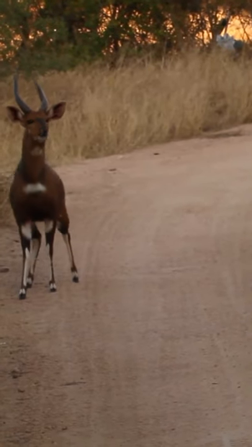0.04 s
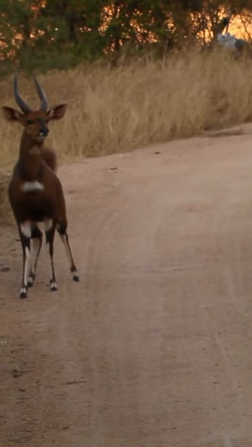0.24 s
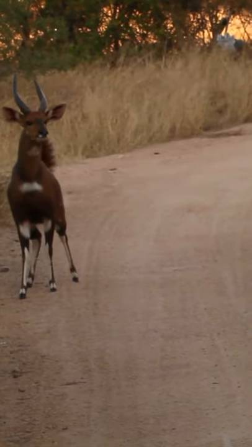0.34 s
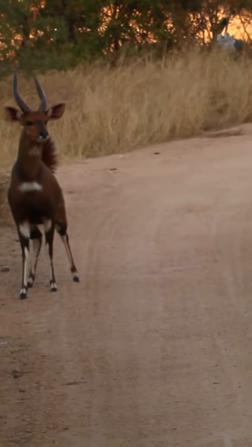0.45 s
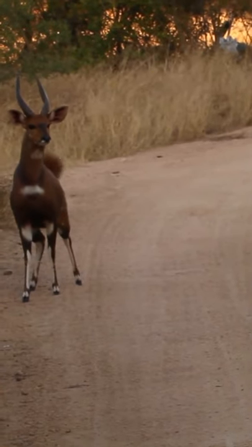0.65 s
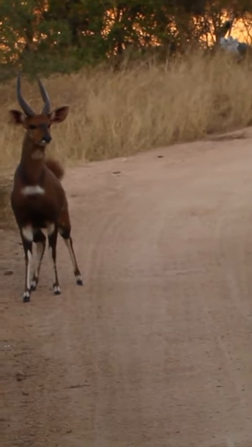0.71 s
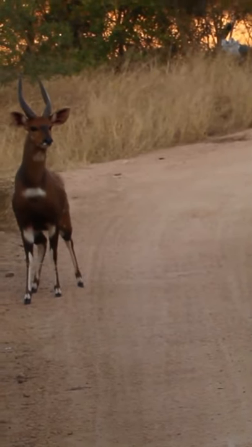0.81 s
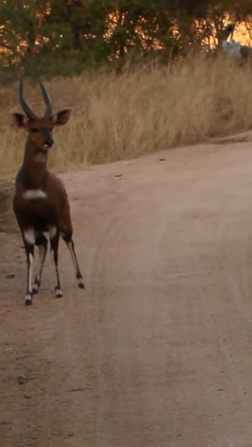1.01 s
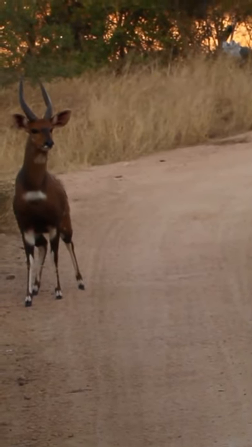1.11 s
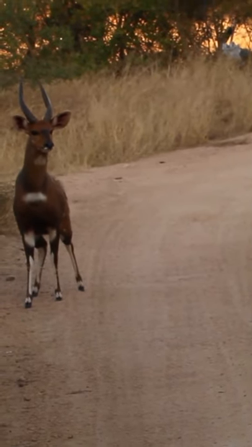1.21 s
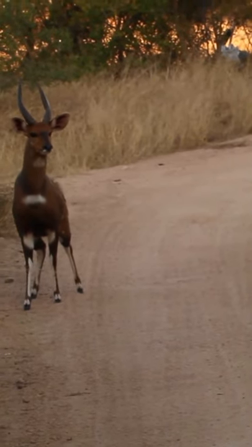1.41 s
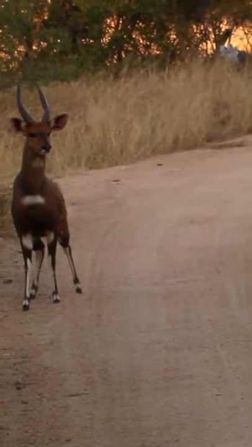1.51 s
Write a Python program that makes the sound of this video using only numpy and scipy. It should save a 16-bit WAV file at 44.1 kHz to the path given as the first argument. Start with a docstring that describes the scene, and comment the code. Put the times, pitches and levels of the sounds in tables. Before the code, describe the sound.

An antelope gives one harsh bark outdoors, echoing briefly over faint distant peeps.

```python
"""An antelope gives one harsh alarm bark on a dirt road at dusk.
Source and filter: irregular slaps of the vocal folds and a blast of air excite its throat resonances.
Road and grass scatter the sound, the bush adds a dull tail and far trees return a late echo.
Far off a small creature peeps over a soft wavering hum and the evening hiss; one faint tick is near."""
import sys
import numpy as np
from scipy import signal
from scipy.fft import rfft, irfft
from scipy.io import wavfile
from scipy.ndimage import uniform_filter1d

SR = 44100
rng = np.random.default_rng(int(sys.argv[2]) if len(sys.argv) > 2 else 0)


def store_pcm(level_fs):
    """Save levels as 16-bit WAV."""
    pcm = np.round(np.clip(level_fs, -1, 1) * 32767).astype(np.int16)
    wavfile.write(sys.argv[1], SR, np.atleast_2d(pcm).T)


N = 68355
T = np.arange(N) / SR


def amp(db):
    """Amplitude ratio of a level in decibels."""
    return 10 ** (np.asarray(db) / 20)


def unit_rms(x):
    """Normalisation to an rms of 1."""
    return x / np.sqrt(np.mean(x ** 2) + 1e-20)


def steadied(x, size=1700):
    """Division by the running rms holds the level near 1 and leaves the fast grain."""
    power = uniform_filter1d(uniform_filter1d(x ** 2, size), size // 2)
    return x / np.sqrt(abs(power) + 1e-20)


def curve_at(points, hz):
    """Interpolation on a logarithmic frequency axis."""
    point_hz, value = np.transpose(points)
    return np.interp(np.log(hz + 1), np.log(point_hz + 1), value)


def drift(rate_hz):
    """Random fluctuation: low-passed noise of rms 1."""
    hz = np.fft.rfftfreq(N, 1 / SR)
    return unit_rms(irfft(rfft(rng.standard_normal(N)) * np.exp(-(hz / rate_hz) ** 2), N))


def colour(x, spectrum, size=4096):
    """Minimum-phase filtering: the phase is the Hilbert transform of the log gain."""
    log_gain = np.log(amp(curve_at(spectrum, abs(np.fft.fftfreq(size, 1 / SR)))))
    taps = np.fft.ifft(np.exp(np.conj(signal.hilbert(log_gain)))).real
    return signal.oaconvolve(x, taps[:size // 2])[:N]


def resonate(x, hz, width_hz):
    """Resonance by heterodyning: shift hz to zero, low-pass with a double pole, shift back."""
    carrier = np.exp(2j * np.pi * np.cumsum(hz * np.ones(N)) / SR)
    pole = np.exp(-np.pi * width_hz * np.sqrt(2) / SR)
    baseband = signal.lfilter([(1 - pole) ** 2], [1, -2 * pole, pole * pole], x / carrier + 1e-18)
    return 2 * (carrier * baseband).real


def evening_air(level_db=-53, patch_db=2.0, size=1024):
    """Coloured noise whose level fluctuates in patches of time and frequency."""
    # ambient spectrum: frequency_hz, density_db
    spectrum = [(20, -24), (55, -1.5), (90, -11), (170, -9.5), (250, -6.5), (330, -5.5), (450, 5.5),
                (560, -5), (720, 0), (950, -11), (1230, -15.5), (1430, -10.5), (1750, -16.5), (2500, -17.5),
                (3700, -18), (5500, -23), (9000, -26.5), (12000, -26.5), (12500, -30.5), (13100, -21.5)]
    hz, _, bands = signal.stft(rng.standard_normal(N), SR, nperseg=size)
    patches = uniform_filter1d(rng.standard_normal(bands.shape), size=8, axis=0)
    patches = unit_rms(uniform_filter1d(patches, size=4, axis=1))
    bands = bands * amp(curve_at(spectrum, hz)[:, None] + patch_db * patches)
    return amp(level_db) * unit_rms(signal.istft(bands, SR, nperseg=size)[1][:N])


def hum():
    """Narrow bands of noise are heard as a far hum of wavering pitch."""
    # bands of the hum: centre_hz, width_hz, gain_db
    bands = [(364.1, 21, 0), (428, 61, -6), (1402, 91, -17)]
    # its swells: time_s, level_db
    swells = [(0, -56.5), (0.09, -52.5), (0.17, -69), (0.7, -59), (0.93, -53.5), (1.02, -59.5),
              (1.065, -46), (1.14, -58.5), (1.2, -47.5), (1.27, -59), (1.37, -53.5), (1.55, -58.5)]
    tones = sum(amp(db) * steadied(resonate(rng.standard_normal(N), hz, width_hz))
                for hz, width_hz, db in bands)
    return amp(np.interp(T, *np.transpose(swells))) * tones


def peeps(length_s=0.037, fall_hz_per_s=6600, waver_hz=36.2):
    """Frequency modulation: each distant peep is a short sine tone that falls and wavers."""
    # calls of the small creature: start_s, pitch_hz, level_db
    calls = [(0.056, 2840, -71), (0.104, 2790, -63.5), (0.674, 2770, -66), (0.809, 2790, -63),
             (0.95, 2775, -62), (1.079, 2720, -60.5), (1.201, 2720, -60), (1.345, 2720, -60.5),
             (1.461, 2772, -58.5)]
    out = np.zeros(N)
    for start_s, hz, db in calls:
        pitch_hz = hz - fall_hz_per_s * (T - start_s - length_s / 2) + waver_hz * drift(167)
        swell = np.sin(np.pi * np.clip((T - start_s) / length_s, 0, 1)) ** 2
        out += amp(db) * swell * np.sqrt(2) * np.sin(2 * np.pi * np.cumsum(pitch_hz) / SR)
    return out


def tick(start_s=1.4435, level_db=-43, decay_s=.002):
    """A transient: noise with a fast exponential decay is heard as a dry tick."""
    # spectrum of the tick: frequency_hz, gain_db
    spectrum = [(100, -25.5), (500, -2), (1200, 10.5), (2400, -4), (3000, -11), (3700, -3), (4600, -23),
                (12000, -40)]
    burst = (T > start_s) * np.exp(-abs(T - start_s) / decay_s)
    return amp(level_db) * burst * unit_rms(colour(rng.standard_normal(N), spectrum))


def scatter(decay_times, size=256, mean_gap=16):
    """Diffuse reflection: sparse impulses, with equal energy per band and a decay time for each."""
    reflections = rng.choice([-1., 1.], N) * (rng.random(N) < 1 / mean_gap)
    hz, time_s, bands = signal.stft(reflections, SR, nperseg=size)
    t60_s = curve_at(decay_times, hz)[:, None]
    bands = bands * amp(-60 * time_s / t60_s) / np.sqrt(t60_s)
    tail = signal.istft(bands, SR, nperseg=size)[1][:N]
    return tail * np.sqrt(mean_gap * 2 * np.log(1000) / SR)


def outdoors(direct, ground_db=-10.5, ground_t60_s=0.27, echo_s=.243, echo_db=-19):
    """Superposition of direct sound, ground scatter, bush reverberation and an echo from far trees."""
    # response of the bush: frequency_hz, gain_db
    bush_spectrum = [(100, -28), (350, -18.5), (470, 0.5), (600, -15), (800, -0.5), (1050, -17.5),
                     (1400, -20), (1620, -21), (2000, -22.5), (2500, -15), (3500, -27.5), (10000, -27)]
    # its reverberation time: frequency_hz, t60_s
    bush_decay = [(100, 1.2), (350, 0.49), (700, 1.17), (1600, 0.95), (3500, 0.8), (10000, .3)]
    ground = amp(ground_db) * scatter([(100, ground_t60_s), (10000, ground_t60_s)])
    bush = colour(scatter(bush_decay), bush_spectrum)
    dulled = resonate(direct, hz=550, width_hz=240)
    echo = amp(echo_db) * np.interp(T - echo_s, T, dulled, left=0)
    return direct + signal.fftconvolve(direct, ground + bush)[:N] + echo


def mouth_hiss(puffs):
    """Turbulence: air rushing through the mouth hisses, mostly in the treble."""
    # spectrum of the hiss: frequency_hz, density_db
    spectrum = [(100, -48), (2000, -22), (2650, -17), (3050, -3), (3400, 1.5), (3750, -4), (4100, -20.5),
                (4450, -7), (5100, -8), (6200, -14.5), (6900, -16), (7400, -22), (8000, -17.5),
                (8800, -19.5), (9350, -29.5), (10000, -17.5), (11100, -31), (11800, -21), (14000, -40)]
    # hiss relative to the force of the bark: time_s, gain_db
    share = [(0.183, -6), (0.203, -17), (0.222, -12), (0.255, -14), (0.30, -15), (0.345, -22), (0.39, -21)]
    return amp(np.interp(T, *np.transpose(share))) * steadied(colour(puffs, spectrum))


def vocal_folds(since_peak_s, pitch_hz=149.67, sag_per_s=4.0, jitter=.4, shimmer_db=1.5):
    """Glottal source with jitter and shimmer: returns the slaps and three noises pulsed in step."""
    puff_cycles, leak = 0.36, 0.69  # decay of a puff, airflow between puffs
    phase_cycles = np.cumsum(pitch_hz * np.exp(-sag_per_s * since_peak_s + jitter * drift(100))) / SR
    cycle = phase_cycles.astype(int)
    force = amp(shimmer_db * np.clip(rng.standard_normal(N), -2, 2))[cycle]
    slaps = steadied(np.diff(cycle, prepend=0) * force + 1e-4 * rng.standard_normal(N))
    airflow = leak + force * np.exp(-(phase_cycles % 1) / puff_cycles)
    return slaps, [steadied(airflow * rng.standard_normal(N)) for _ in range(3)]


def throat(drive, since_peak_s, body_db=-4.5):
    """Vocal tract filter: gliding formants swell and fade in parallel with a broad response."""
    # broad body of the bark: frequency_hz, density_db
    body = [(30, -68), (90, -49), (135, -27), (180, -16), (280, -8), (370, -4), (470, -5), (540, 0),
            (700, 2), (820, -3.5), (930, 1), (1150, -5), (1350, -1), (1800, -7.5), (2200, -6.5),
            (2480, -34), (3000, -47), (8000, -81.5)]
    # throat resonances: centre_hz, width_hz, gain_db, strongest_s, fade_db_per_s, glide_hz_per_s
    formants = [(185, 26, -16, 0.36, 109, 44.5), (370, 43, -7.5, .32, 12, -4),
                (585, 55, -6, 0.243, 78, -150), (1000.6, 148, -1.5, 0.21, 123, -200),
                (1638, 132, -2, .33, 38, -150), (2106, 157, -16.5, .29, 30, -600)]
    voice = amp(body_db) * steadied(colour(drive, body), size=700)
    for hz, width_hz, db, strongest_s, fade, glide in formants:
        ringing = steadied(resonate(drive, hz + glide * since_peak_s, width_hz), size=1000)
        voice += amp(db - abs(fade * (T - strongest_s))) * ringing
    return voice


def bark(peak_s=.225, air_share=0.7, chest_cut_hz=99):
    """Source-filter voice: folds and air drive the throat. Returns the call and its sideways hiss."""
    # force of the bark: time_s, level_db
    effort_curve = [(0.174, -54), (0.188, -41.5), (0.195, -40), (0.203, -22), (0.214, -19), (0.222, -13),
                    (0.27, -16), (0.295, -17), (0.322, -18.5), (0.35, -28.5), (0.385, -33.5), (0.41, -60)]
    flutter_hz, flutter_db, crest_s = 43, 1.5, .229  # slow flapping of the throat
    since_peak_s = np.clip(T - peak_s, -.05, .2)  # the mouth is widest at peak_s, then closes
    slaps, (throat_puffs, mouth_puffs, side_puffs) = vocal_folds(since_peak_s)
    drive = np.sqrt(1 - air_share) * slaps + np.sqrt(air_share) * throat_puffs
    flutter = amp(flutter_db * np.cos(2 * np.pi * flutter_hz * (T - crest_s)))
    effort = amp(np.interp(T, *np.transpose(effort_curve), left=-120, right=-120))
    call = effort * (flutter * throat(drive, since_peak_s) + mouth_hiss(mouth_puffs))
    radiation = signal.butter(2, chest_cut_hz, "high", fs=SR, output="sos")  # bass radiates poorly
    return signal.sosfilt(radiation, call), effort * mouth_hiss(side_puffs)


def scene(wide_above_hz=4730, side_hiss_db=-7, side_air_db=-2):
    """Mid-side stereo: every source is centred and only the treble differs between the ears."""
    call, side_hiss = bark()
    mid = outdoors(call) + evening_air() + hum() + peeps() + tick()
    spread = amp(side_hiss_db) * outdoors(side_hiss) + amp(side_air_db) * evening_air()
    treble = signal.butter(16, wide_above_hz, "high", fs=SR, output="sos")
    side = signal.sosfilt(treble, spread)
    return np.array([mid + side, mid - side])


def record(dry):
    """Band limiting: a linear-phase low-pass filter removes the highest treble."""
    cutoff_hz = 13150
    taps = signal.firwin(511, cutoff_hz, window=("kaiser", 9), fs=SR)
    return signal.oaconvolve(dry, taps[None], "same")


dry = scene()
out = record(dry)
store_pcm(out)
```